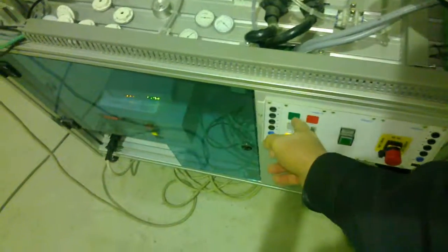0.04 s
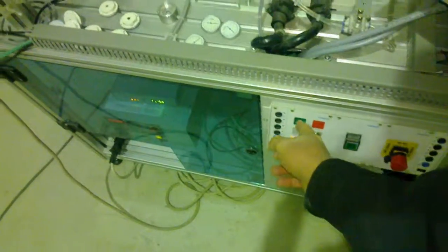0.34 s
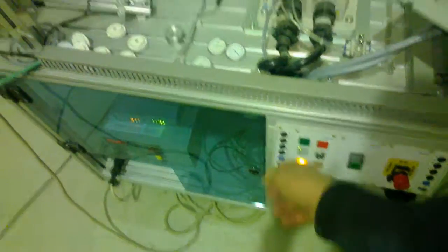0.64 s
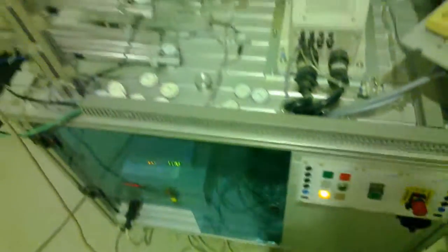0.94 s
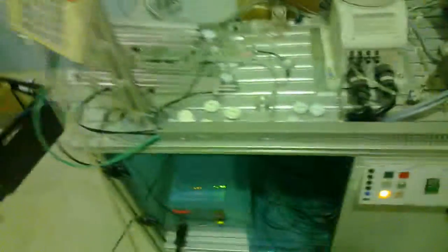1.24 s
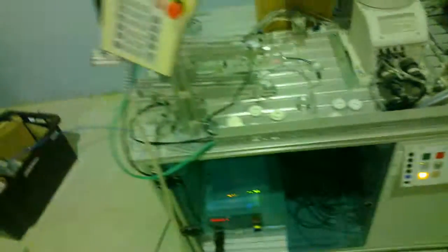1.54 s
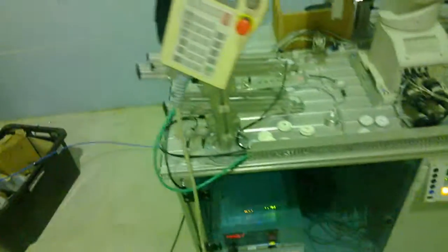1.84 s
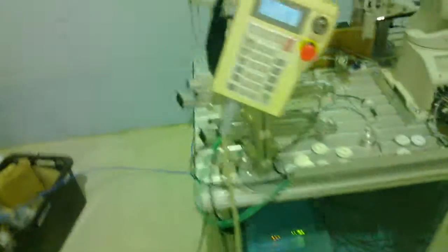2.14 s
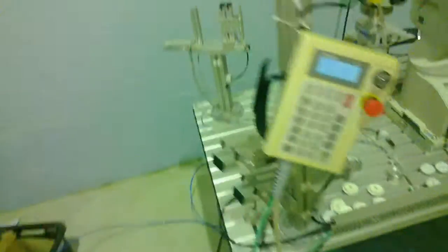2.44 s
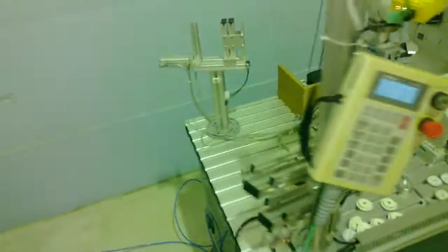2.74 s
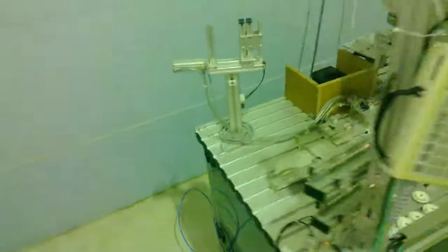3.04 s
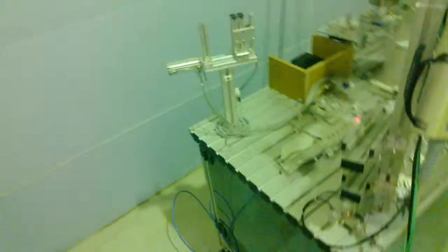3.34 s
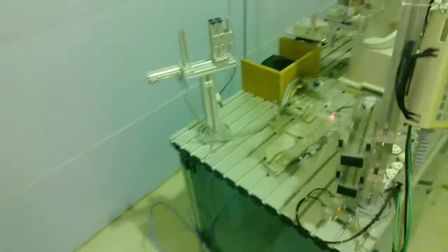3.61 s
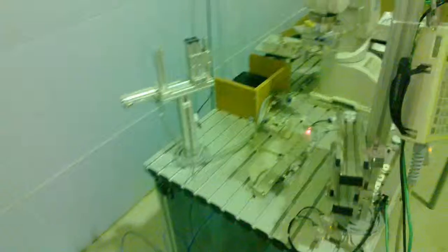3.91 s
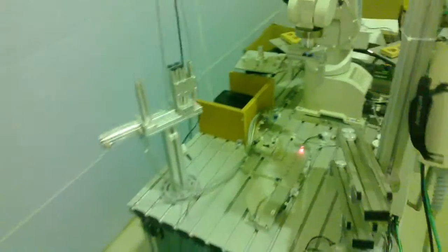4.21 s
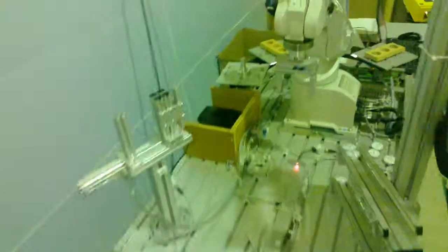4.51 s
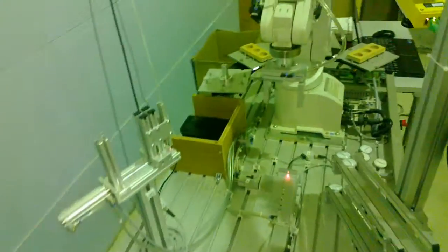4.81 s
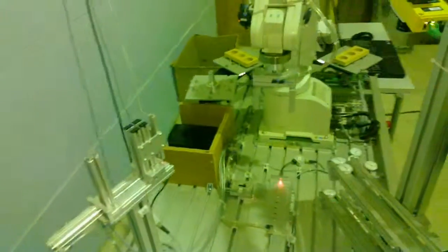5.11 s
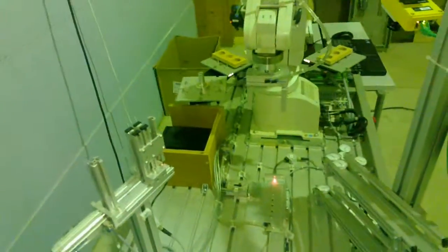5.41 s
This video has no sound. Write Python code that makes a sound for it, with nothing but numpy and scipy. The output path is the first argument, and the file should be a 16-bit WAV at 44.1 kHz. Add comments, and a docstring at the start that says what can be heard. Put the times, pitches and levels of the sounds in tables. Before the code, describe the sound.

A small air compressor throbs and rattles steadily in a workshop, growing slowly louder, with a spit of air at the end.

```python
"""A tiled workshop: a small piston air compressor throbs steadily beside a robot training station.
Each turn of its crankshaft gives a stroke of hum and a rattle of valves over the fan's rush. The microphone
is carried along the bench through the room's standing waves, so the hum changes colour and whines come
and go. The whir, a faint high hiss and the steady tones all grow gradually louder. Faint ticks and soft
footfalls sit underneath; in the very last instant a pneumatic valve spits air."""
import sys
import numpy as np
from scipy import signal
from scipy.fft import rfft, irfft, next_fast_len
from scipy.io import wavfile

SR = 44100
rng = np.random.default_rng(int(sys.argv[2]) if len(sys.argv) > 2 else 0)


def put_to_file(sound):
    """Save the sound as 16-bit audio at rate SR, in the file named by the first command-line argument."""
    columns = np.atleast_2d(sound).T  # one column per channel
    safe = np.clip(columns, -1, 1)
    whole_steps = np.round(safe * 32767)
    wavfile.write(sys.argv[1], SR, whole_steps.astype(np.int16))


N = 245195
TIME = np.arange(N) / SR
EAR_SIGN = np.array([[1], [-1]])   # left, right

# crankshaft speed (time [s], speed [turns/s])
CRANK_SPEED = [(0, 26.597), (2.2, 26.603), (3.6, 26.612), (4.5, 26.638), (5.56, 26.638)]
# stereo balance (frequency [Hz], left minus right [dB])
BALANCE = [(25, 1), (55, 1), (130, .5), (210, .5), (500, -.5), (1200, 0), (1800, -2.5), (2700, -9.5),
           (3800, -10), (4900, -3), (6200, -6.5), (8000, 1), (10000, -2), (15000, -2.5)]


def piston_hum(turns, walk):
    """Harmonics of the piston stroke, heard through the standing waves of the room."""
    # low body of the hum (order, level at bench start [dB], level at bench end [dB])
    body = [(1, -44.5, -36), (3, -52, -39.5), (4, -50, -43), (6, -49.5, -52.5), (7, -47, -35.5)]
    # higher harmonics that meet their wall reflection
    # (order, crest at bench start [dB], crest at bench end [dB], time of one crest [s], spacing [s])
    overtones = [(8, -55, -52.5, 2.87, 3.1), (10, -64, -54, 3.4, 1.83), (11, -54, -54.5, 1.4, 3.03),
                 (14, -68.5, -50.5, 5, 2.08), (17, -61, -70, 2.85, 2.7), (25, -69.5, -55, 4.37, 1.43),
                 (38, -64.5, -58.5, 3, 3.3), (54, -58, -63, 2.7, 3.5), (56, -74, -56.5, 5.03, 2),
                 (93, -77, -56, 5.77, 1.56), (97.3, -81, -64, 3.5, 2), (97, -75, -65, 4.7, 1.6)]
    # harmonics that sing out unevenly among many reflections, order: (time [s], level [dB])
    singing = { 2: [(0, -36.5), (1.2, -41), (3.2, -41.5), (3.9, -37), (5.56, -36.5)], 5: [(0, -38),
               (2.1, -37.5), (3.2, -39.5), (4.0, -37.5), (5.56, -37.5)], 9: [(0, -57), (1.0, -61),
               (1.9, -60), (2.45, -64), (3.15, -49), (3.75, -44.5), (4.4, -48.5), (5.0, -50.5),
               (5.56, -54)], 12: [(0, -52), (.65, -57), (.98, -52.5), (1.3, -54), (1.6, -63), (2.9, -63),
               (3.25, -51.5), (3.55, -46), (4.0, -45.5), (4.18, -61), (4.38, -45.5), (4.97, -46),
               (5.17, -56), (5.4, -51)], 24: [(0, -75), (1.25, -60), (1.9, -67), (2.95, -59), (3.55, -72),
               (4.3, -52), (4.75, -68), (5.56, -59)], 26: [(0, -65), (2.9, -75), (3.15, -57), (3.5, -53),
               (3.8, -65), (4.12, -73), (4.35, -56.5), (4.7, -54.5), (5.05, -58), (5.4, -52.5)],
               28: [(0, -63), (1.0, -59), (1.4, -72), (1.85, -56), (2.3, -53), (2.85, -59), (3.15, -77),
               (3.4, -60), (3.8, -66), (4.35, -59), (4.85, -73)], 30: [(0, -67), (.95, -60.5), (1.2, -63),
               (2.5, -71), (3.1, -60), (3.6, -54.5), (3.95, -74), (4.4, -59), (4.8, -71), (5.3, -56)],
               42: [(0, -62), (1.1, -69), (3.3, -76), (3.65, -58), (4.35, -58), (4.7, -64), (5.56, -67)],
               50: [(0, -66), (.9, -60), (1.15, -76), (1.8, -73), (2.45, -66), (2.72, -56), (3.08, -73),
               (3.45, -56), (3.85, -60), (4.25, -67), (5.1, -53.5), (5.4, -61)], 68: [(0, -60),
               (.55, -62.5), (.85, -77), (3.6, -71), (4.0, -56.5), (4.35, -68), (5.0, -55.5), (5.4, -65)]}
    out = np.zeros((2, N))
    for order, start_db, end_db in body:
        level_db = start_db + (end_db - start_db) * walk
        out += standing_wave(order) * harmonic(order, level_db, turns)
    for order, start_db, end_db, crest_s, spacing_s in overtones:
        level_db = start_db + (end_db - start_db) * walk
        out += wall_reflection(crest_s, spacing_s) * harmonic(round(order), level_db, turns)
    for order, levels in singing.items():
        out += standing_wave(order) * harmonic(order, in_time(levels), turns)
    return out


def harmonic(order, db, turns, waver_db=0.45, waver_per_order_db=0.0193, ear_lag_s=0.00017):
    """One harmonic of the stroke at both ears, wavering a little around its level."""
    level_db = db + (waver_db + waver_per_order_db * order) * drift(4.3)
    # the room delays the higher harmonics more, which smears each stroke
    lag_turns, smear_rad = .255, .395
    phase = 2 * np.pi * order * (turns - lag_turns) - smear_rad * order ** 2
    # each harmonic arrives from its own direction, so short waves reach the ears out of step
    hz = order * CRANK_SPEED[0][1]
    ear_phase = np.pi * hz * ear_lag_s * rng.uniform(-1.3, 1)
    return ear_gains(hz) * from_db(level_db) * np.sqrt(2) * np.cos(phase + EAR_SIGN * ear_phase)


def standing_wave(order, inverted_order=6):
    """Gain of a harmonic in the room: at a node it vanishes and comes back with its polarity flipped."""
    # nodes the microphone passes (order, time [s], half width [s])
    nodes = [(2, 2.74, 0.57), (4, 0.9, 1.8), (7, 2.6, 0.56)]
    polarity = -1 if order == inverted_order else 1   # this one stays in an opposite lobe all the way
    crossings = [np.tanh((TIME - s) / width) for k, s, width in nodes if k == order]
    return polarity * np.prod(crossings, axis=0)


def wall_reflection(crest_s, spacing_s, strength=0.72):
    """Gain of a tone plus its reflection along the walk: 1 on each crest, a dip between."""
    in_step = np.cos(2 * np.pi * (TIME - crest_s) / spacing_s)
    return np.sqrt(1 + strength ** 2 + 2 * strength * in_step) / (1 + strength)


def clatter(turns, places=14, size=4096, memory=0.56):
    """Valves and piston repeat one reverberant rattle a turn; its grain changes from place to place."""
    # colour of the rattle (frequency [Hz], relative density [dB])
    colour = [(270, 0.5), (330, 0.5), (400, -0.5), (520, 1.5), (640, 0.5), (740, -2.5), (870, 1),
              (1000, -3), (1300, -2.5), (1500, -2.5), (1800, -1.5), (2050, -3.5), (2600, -1.5),
              (3300, -2.5), (4200, -11), (5000, -18.5), (6000, -29), (8000, -41)]
    hz = np.arange(size // 2 + 1) * turns[-1] / TIME[-1]
    place = TIME / TIME[-1] * (places - 1)
    grain = rng.standard_normal((2, size))
    out = np.zeros((2, N))
    for k in range(places):
        grain = memory * grain + np.sqrt(1 - memory ** 2) * rng.standard_normal((2, size))
        rattle = rms_one(irfft(two_ears(rfft(grain), hz, colour), size))
        near = np.abs(place - k) < 1
        fade = 1 - np.abs(place[near] - k)
        fade /= np.sqrt(1 - 2 * (1 - memory) * fade * (1 - fade))   # constant-power crossfade
        playhead = turns[near] % 1 * size
        out[:, near] += fade * np.array([np.interp(playhead, np.arange(size), ear) for ear in rattle])
    return out


def fan_rush():
    """Air and the motor fan rush over a low rumble."""
    # colour of the rush (frequency [Hz], relative density [dB])
    colour = [(14, 15.5), (40, 9), (100, 2.5), (280, 5), (400, 3.5), (520, 0.5), (700, 1), (1000, -0.5),
              (1250, -3.5), (2000, -2), (2600, -3), (3300, -2.5), (4200, -9.5), (5200, -17.5),
              (8000, -38.5)]
    return noise(colour)


def swelling(whir, q=4.6):
    """As the microphone moves, one band of the whir after another comes forward or sinks back."""
    # swells and dips (time [s], half length [s], centre [Hz], gain [dB])
    swells = [(1.2, 0.27, 1080, -3.5), (1.2, .25, 620, 2.5), (1.65, 0.18, 720, -1.5), (2.65, .25, 490, 2.5),
              (3.85, 0.15, 1020, 2.5), (4.55, 0.24, 500, -2), (4.55, 0.41, 1960, 1.5)]
    for s, half_s, hz, db in swells:
        band = signal.lfilter(*signal.iirpeak(hz, q, fs=SR), whir)
        gain = from_db(db * np.exp(-((TIME - s) / half_s) ** 2))
        whir = whir + (gain - 1) * band
    return whir


def bench_shadow(whir, walk, shade_db=-2.5, edge_hz=2200):
    """Low beside the panel the bench hides some of the treble; it opens up along the way."""
    treble = signal.sosfilt(signal.butter(1, edge_hz, "high", fs=SR, output="sos"), whir)
    return whir + (from_db(shade_db * (1 - walk)) - 1) * treble


def housing_ring(whir, centre_hz=2584, width_hz=150):
    """The whir rings in a narrow resonance of the housing, which swells and fades along the walk."""
    # ring against the whir (time [s], level [dB])
    ring_level = [(0, -19), (3.0, -14), (3.25, -4), (3.5, -3), (3.85, -11), (4.45, -13), (4.7, -7),
                  (5.56, -11)]
    ringing = signal.lfilter(*signal.iirpeak(centre_hz, centre_hz / width_hz, fs=SR), whir)
    return from_db(in_time(ring_level)) * ringing


def valve_puff(level_db=-34):
    """A pneumatic valve opens and spits a sharp puff of air."""
    # colour of the puff (frequency [Hz], relative density [dB])
    colour = [(300, 9), (600, 12), (1500, -15), (4000, 4), (6000, -7.5), (8700, 0.5), (11000, -11),
              (14500, 1.5), (16000, -4)]
    return from_db(level_db) * burst(start_s=5.5455, rise_s=0.0022, decay_s=0.088) * noise(colour)


def mains_and_motors(walk, rise_db=4.5):
    """Steady tones of the mains and other motors, growing gradually louder."""
    # pitch of each tone (frequency [Hz])
    pitches = (31.2, 62.4, 100, 255.3, 314, 322.3, 399.3, 9000)
    # each tone at the bench end (level [dB])
    levels = (-51.5, -62, -52.5, -65, -67, -59, -65.5, -91)
    drone = sum(from_db(db) * np.sin(2 * np.pi * (hz * TIME + rng.random()))
                for hz, db in zip(pitches, levels))
    return np.sqrt(2) * drone * from_db(rise_db * (walk - 1))


def thin_whine(hz=1039.3, waver_db=1.4):
    """A thin, wavering whine comes and goes along the walk."""
    # rise and fall of the whine (time [s], level [dB])
    whine_level = [(0, -63), (1.3, -73), (1.55, -60), (2.2, -60), (2.5, -70), (2.8, -59), (3.1, -73),
                   (4.5, -65), (4.95, -58.5), (5.56, -65)]
    gain = from_db(in_time(whine_level) + waver_db * drift(7.1))
    return np.sqrt(2) * gain * np.sin(2 * np.pi * hz * TIME)


def ticks_and_steps():
    """Small bright ticks in stereo over dull thuds in the centre."""
    # push button and handling (time [s], level [dB], centre [Hz], decay [s])
    ticks = [(.147, -69, 8550, .012), (.426, -60, 8500, .014), (.565, -67, 6500, .012),
             (.97, -54, 2600, .02), (1.075, -68, 13000, .05), (1.235, -65, 6000, .012),
             (1.585, -68, 13000, .03), (1.725, -63, 12900, .035), (3.18, -67, 9000, .04)]
    # soft footfalls, shuffles and bumps (time [s], level [dB], centre [Hz], decay [s])
    steps = [(.99, -43, 221, 0.031), (1.49, -39, 45, 0.065), (2.83, -39, 49, .08), (2.97, -49, 35, .06)]
    return taps(ticks, rise_s=.002, channels=2) + taps(steps, rise_s=0.015, channels=1)


def high_hiss(turns, pulse_db=0.73, lag_turns=0.89):
    """A faint high background hiss, pulsing slightly with each turn."""
    # colour of the hiss (frequency [Hz], relative density [dB])
    colour = [(3500, -13), (5200, -3.5), (5900, 2.5), (7000, -4), (8500, -8.5), (11000, -10), (14000, -7),
              (15000, -10), (16000, -20)]
    pulse = from_db(pulse_db * np.cos(2 * np.pi * (turns - lag_turns)))
    return pulse * noise(colour)


def taps(rows, rise_s, channels):
    """Short dying bursts of band-passed noise."""
    out = np.zeros((channels, N))
    for s, db, hz, decay_s in rows:
        band = signal.butter(2, [hz * 0.76, min(hz * 1.2, .45 * SR)], "band", fs=SR, output="sos")
        texture = rms_one(signal.sosfilt(band, rng.standard_normal((channels, N))))
        out += from_db(db) * burst(s, rise_s, decay_s) * texture
    return out


def burst(start_s, rise_s, decay_s):
    """Envelope that opens quickly and dies away."""
    age = np.maximum(TIME - start_s, 0)
    return np.minimum(age / rise_s, 1) * np.exp(-age / decay_s)


def noise(colour):
    """Stereo noise of a given colour, rms 1."""
    size = next_fast_len(N)
    white = rfft(rng.standard_normal((2, size)))
    hz = np.arange(size // 2 + 1) * SR / size
    return rms_one(irfft(two_ears(white, hz, colour), size)[:, :N])


def two_ears(pair, hz, colour):
    """Colour two unrelated spectra and mix them to stereo: narrow in the low mids, wide in the treble."""
    # likeness of the two ears (frequency [Hz], correlation [-1 to 1])
    likeness = [(25, .2), (60, .55), (110, .87), (270, .93), (450, .82), (740, .6), (1220, .4),
                (1700, -.08), (3300, -.12), (5500, -.05), (9000, .2), (15000, .2)]
    alike = at_hz(likeness, hz)
    ears = np.sqrt(1 + alike) * pair[0] + EAR_SIGN * np.sqrt(1 - alike) * pair[1]
    pan = ear_gains(hz)
    pan /= np.sqrt(np.mean(pan ** 2, axis=0))
    low_cut = 1 / np.sqrt(1 + (colour[0][0] / (hz + 1e-3)) ** 8)
    return ears * pan * from_db(at_hz(colour, hz)) * low_cut


def ear_gains(hz):
    """Left and right gain at a frequency."""
    return from_db(EAR_SIGN * at_hz(BALANCE, hz) / 2)


def drift(rate_hz):
    """Smooth random wandering, rms 1."""
    hz = np.arange(513) * SR / N
    slow = irfft(rfft(rng.standard_normal(1024)) / (1 + (hz / rate_hz) ** 2) ** 2)
    return np.interp(TIME, np.linspace(0, N / SR, len(slow)), rms_one(slow))


def in_time(curve):
    """Read a curve at every sample."""
    return np.interp(TIME, *np.transpose(curve))


def at_hz(curve, hz):
    """Read a curve on a log-frequency axis."""
    frequencies, values = np.transpose(curve)
    return np.interp(np.log(hz + 1e-9), np.log(frequencies), values)


def from_db(db):
    """Decibels to gain."""
    return 10 ** (np.asarray(db) / 20)


def rms_one(x):
    """Scale to unit power."""
    return x / np.sqrt(np.mean(x ** 2) + 1e-20)


def scene(clatter_db=-51, rush_db=-47.5, whir_rise_db=6.5, hiss_db=-65.5, hiss_rise_db=7):
    """One crankshaft drives hum and clatter; whir, hiss and tones all grow gradually louder."""
    # the walk along the bench (time [s], share of the way [0-1])
    route = [(0, 0.14), (1.1, 0.02), (2.0, 0.28), (3.0, 0.52), (3.7, 0.69), (4.8, 0.93), (5.56, 0.99)]
    walk = in_time(route)
    turns = np.cumsum(in_time(CRANK_SPEED)) / SR + 0.00063 * drift(8.0)   # with a slight wobble
    whir = from_db(clatter_db) * clatter(turns) + from_db(rush_db) * fan_rush()
    whir *= from_db(whir_rise_db * walk)
    hiss = from_db(hiss_db + hiss_rise_db * walk) * high_hiss(turns)
    foley = valve_puff() + ticks_and_steps()
    compressor = piston_hum(turns, walk) + bench_shadow(swelling(whir), walk) + housing_ring(whir)
    return compressor + foley + mains_and_motors(walk) + thin_whine() + hiss


def record(dry, cutoff_hz=15750):
    """A steep low-pass takes off the very top."""
    return signal.sosfilt(signal.ellip(12, .1, 80, cutoff_hz, fs=SR, output="sos"), dry)


dry = scene()
out = record(dry)
put_to_file(out)
```